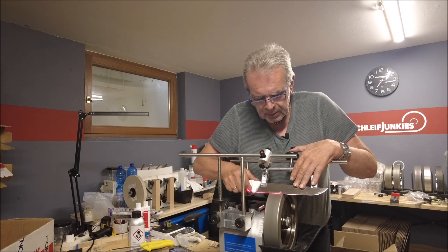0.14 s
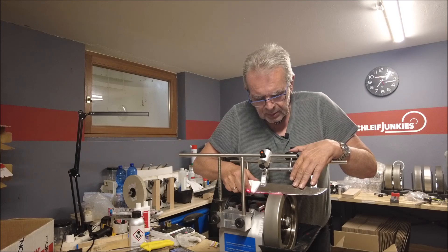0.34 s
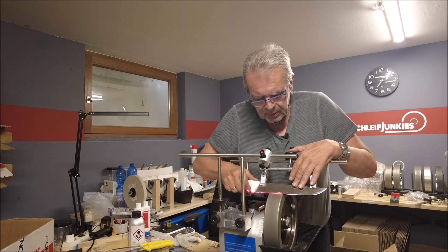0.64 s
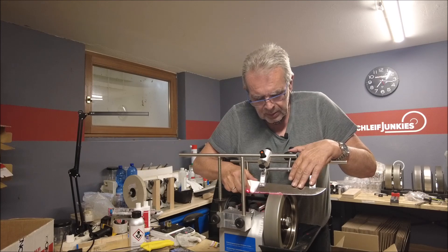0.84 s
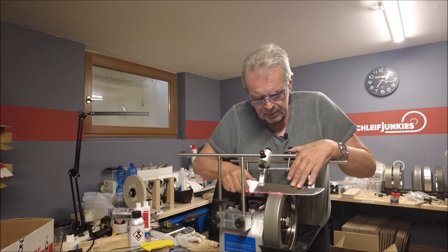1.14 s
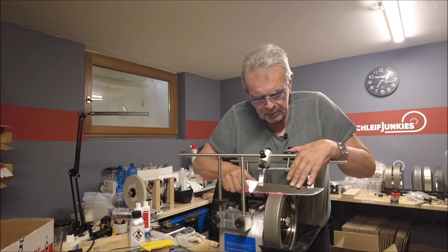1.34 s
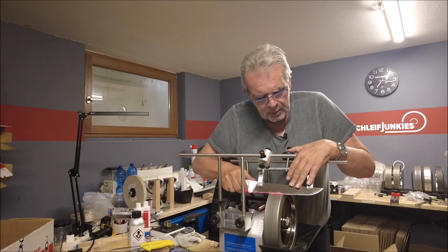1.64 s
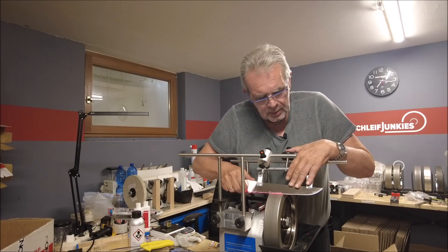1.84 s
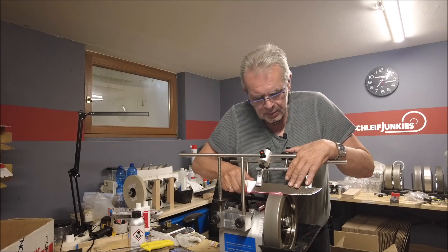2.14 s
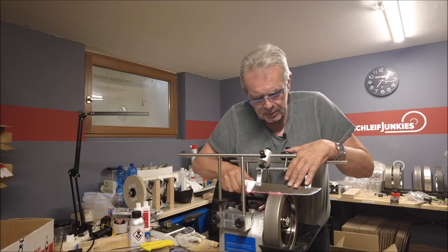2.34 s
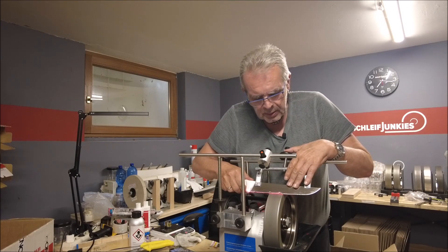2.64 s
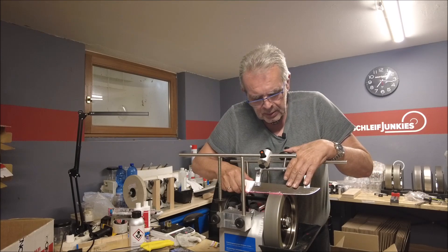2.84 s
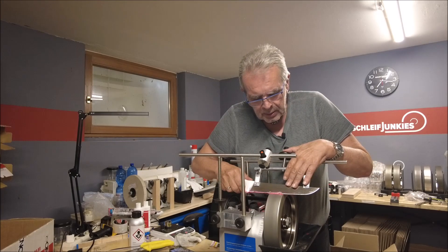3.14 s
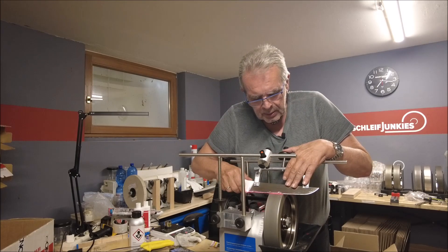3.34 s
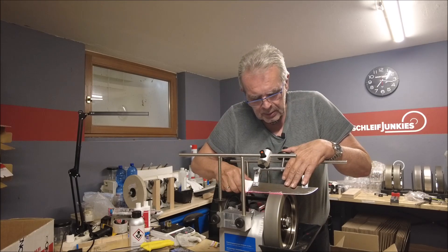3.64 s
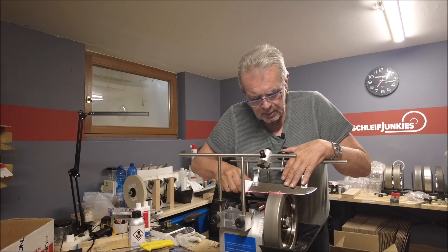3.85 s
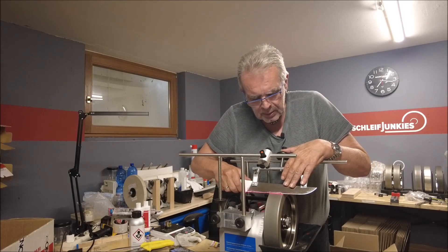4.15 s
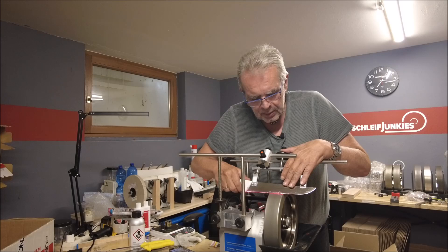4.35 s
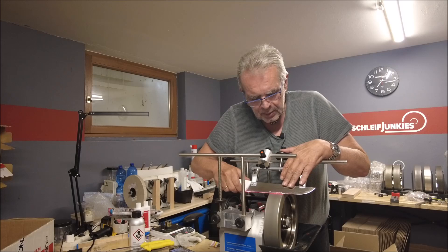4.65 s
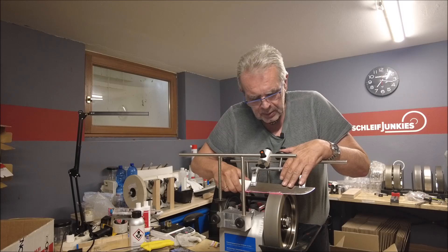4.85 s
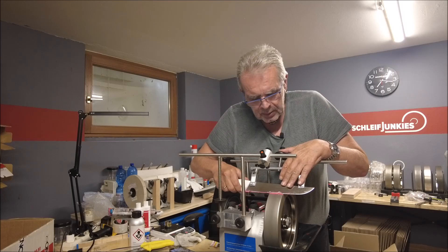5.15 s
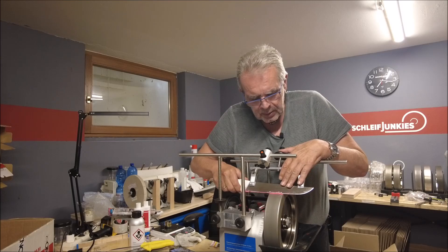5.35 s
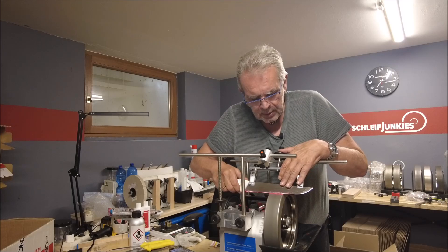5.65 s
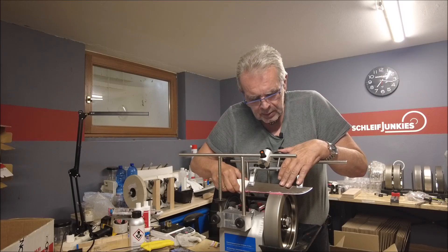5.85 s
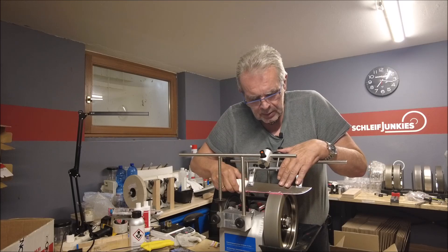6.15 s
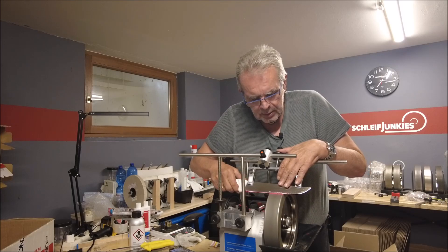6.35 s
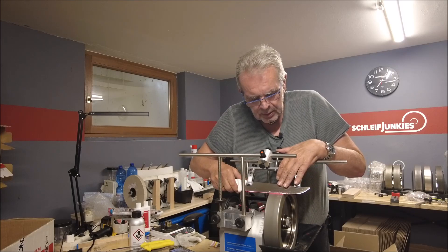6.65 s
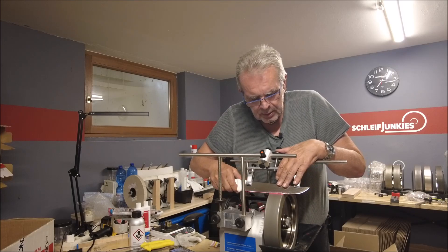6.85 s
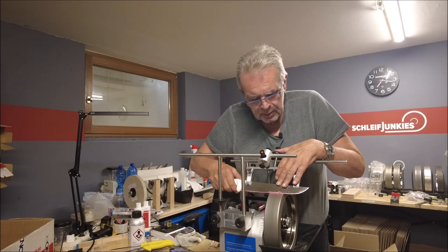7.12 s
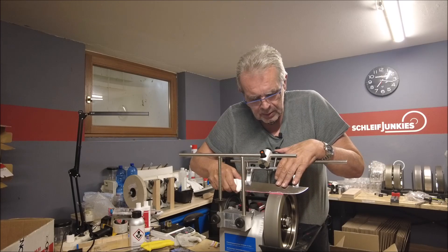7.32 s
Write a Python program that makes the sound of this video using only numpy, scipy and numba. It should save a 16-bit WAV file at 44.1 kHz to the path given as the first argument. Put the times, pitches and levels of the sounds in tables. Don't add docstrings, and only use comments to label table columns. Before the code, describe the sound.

Close in a small workshop, a knife blade is drawn across a spinning grinding wheel without pause. Bright sandy hiss and rough scraping carry wavering glassy squeals, first strong, then thinner in the middle, loudest and most piercing near the end. Loose grit ticks on the steel, and a quiet motor hum grows. A lapel microphone gives a dry, band-limited sound with tiny smeared glitches.

```python
import sys
import numpy as np
from scipy import signal
from scipy.fft import rfft, irfft
from scipy.io import wavfile
from scipy.ndimage import uniform_filter1d
from numba import njit

SR = 44100
rng = np.random.default_rng(int(sys.argv[2]) if len(sys.argv) > 2 else 0)


def materialize(psi):
    bounded = np.clip(np.atleast_2d(psi).T, -1, 1)
    quanta = np.round(bounded * 32767).astype(np.int16)
    wavfile.write(sys.argv[1], SR, quanta)


def level_to_linear(level):
    exponent = np.asarray(level, float) / 20
    return 10 ** exponent


N = 329868
TIME = np.arange(N) / SR

# (time [s], level [dB])
PRESSURE = [(0, -2), (.5, 0), (.75, -2.5), (1.25, 1), (2.0, 1.5), (2.75, -0.5), (3.1, .5), (3.55, -2),
            (4.0, 1.5), (4.25, -3), (4.65, 2.5), (4.9, -0.5), (5.3, 2), (5.75, 0), (6.25, -0.5),
            (6.75, 0.5), (7.2, -3), (7.48, 2)]
# (time [s], rise [dB])
CATCHES = [(.23, 3.5), (.4, 4.5), (.59, 6), (.76, 5.5), (0.949, 9.5), (1.04, 5.5), (1.13, 3), (1.24, 7),
           (1.34, 2.5), (1.75, 2.5), (4.07, 5), (4.33, 7.5), (4.66, 8), (5.29, 5), (5.43, 8.5), (5.55, 0.5),
           (5.67, 7), (5.79, 2.5), (5.89, 5.5), (5.95, 7), (6.01, 5), (6.12, 7), (6.24, 4.5), (6.29, 7),
           (6.39, 4), (6.5, 4.5), (6.8, 7), (6.891, 9.5), (7.19, 10), (7.41, 10)]
# (time [s], level [dB], pitch [Hz])
RING_LOW = [
    (0, -41, 3570),
    (.2, -33.5, 3650),
    (.6, -30.5, 3670),
    (.82, -36.5, 3650),
    (1.0, -27.5, 3776),
    (1.3, -30, 3700),
    (1.55, -31.5, 3745),
    (2.04, -37, 3650),
    (2.3, -48.5, 3520),
]
RING_MID = [
    (3.6, -44, 3500),
    (4.1, -38.5, 3540),
    (4.5, -35.5, 3570),
    (4.7, -32, 3680),
    (4.88, -37, 3620),
    (5.2, -27, 3700),
    (5.5, -43, 3740),
]
RING_HIGH = [
    (0, -43, 4090),
    (.67, -33.5, 4080),
    (1.32, -34, 4140),
    (1.54, -32.5, 4130),
    (1.75, -33.5, 4135),
    (1.92, -32, 4040),
    (2.1, -37.5, 4090),
    (2.61, -35, 4040),
    (2.75, -54, 4040),
]
RING_LATE = [
    (4.95, -31.5, 3900),
    (5.35, -23.5, 3950),
    (6.05, -25, 3993),
    (6.3, -31.5, 3835),
    (6.5, -24, 3994),
    (6.82, -24.5, 4000),
    (6.95, -35.5, 3740),
    (7.1, -40, 3640),
    (7.48, -40, 3625),
]
# (from [s], to [s], middle pitch [Hz], width [Hz], level [dB])
CLAMP_MODES = [(-.5, 2.94, 1395, 38, -52), (3, 5.5, 1080, 38, -50.5), (4.5, 7.9, 1228, 24, -50.5),
               (-11, 9.4, 1735, 78, -52), (0.8, 3, 2420, 54, -49), (5.4, 6.94, 2655, 55, -44.5),
               (1.8, 5.06, 2985, 120, -40.5), (2, 3.68, 3260, 250, -37), (3.5, 5.1, 3150, 270, -39.5),
               (-.5, 2.1, 3240, 180, -46.5), (7, 8.8, 3350, 300, -36.5), (-0.4, 1.2, 3560, 73, -42.5),
               (6.5, 9, 4100, 450, -40.5)]
SPINE_MODES = [(4.8, 7.07, 3725, 123, -31), (2.8, 5.45, 4600, 130, -36.5), (4.8, 7.4, 4485, 160, -39),
               (2.35, 4.8, 4950, 240, -37), (2.0, 5.5, 5325, 150, -43), (5.5, 7.2, 5550, 92, -42),
               (6.93, 7.6, 5300, 130, -36.5), (0.93, 3.4, 5930, 170, -39), (6.4, 7.8, 6125, 100, -46),
               (3.1, 5.0, 6750, 150, -46), (3.7, 4.9, 4050, 560, -44.5), (6.25, 8, 4980, 350, -37)]
FREE_END_MODES = [
    (3.5, 6.3, 1205, 60, -49.5),
    (1.6, 6.15, 2250, 186, -40),
    (-.5, 2.6, 2775, 100, -54.5),
    (1.68, 3.21, 4505, 110, -32.5),
    (4, 5.3, 3850, 340, -34),
]
BEVEL_MODES = [(0.2, 2.9, 7850, 300, -42), (5, 6.22, 8025, 280, -39), (6, 4.77, 9300, 280, -47),
               (0.9, 3.44, 10350, 550, -38), (0, 1.6, 12550, 420, -42), (2.5, 3.0, 11000, 270, -43),
               (3, 4.5, 14250, 800, -46), (5, 8, 14600, 900, -45), (-1, 1.7, 6550, 300, -50)]
BURR_MODES = [(6.32, 7.6, 7980, 380, -43), (0.63, 2.1, 11500, 990, -37.5), (2.55, 5, 11125, 520, -39.5),
              (1.1, 2.2, 13650, 450, -46), (4, 5.9, 12850, 750, -38), (4.76, 6.3, 10175, 510, -40),
              (5.84, 7.58, 10780, 850, -33.5), (3.4, 5.1, 9000, 700, -45), (4.7, 5.9, 13250, 450, -48)]
# (frequency [Hz], level per Hz [dB])
HISS = [(4000, -2), (5500, -2.5), (7100, -6.5), (9000, -4.5), (10900, 0), (13000, -3), (15500, -10),
        (16400, -34)]
RASP = [(1500, -27), (1900, -4), (2300, 9.5), (3400, 7), (4500, 6.5), (6000, -9.5), (7000, 0)]
SCRAPE = [(600, -23), (800, 6.5), (950, -1.5), (1200, 6), (1500, -5), (1800, -1), (2200, -23)]
# (time [s], peak level [dB])
KNOCKS = [(0.1521, -29), (0.388, -19), (0.6494, -12), (0.6737, -15), (1.07, -13), (1.234, -22),
          (1.7524, -15), (1.917, -25), (2.039, -26), (2.438, -22), (2.6683, -25), (2.8679, -34),
          (3.1193, -24), (4.008, -19.5), (4.068, -21), (4.2333, -37), (4.3156, -38), (4.4837, -19),
          (5.522, -17), (5.665, -11.5), (5.8185, -8.5), (5.8835, -29), (6.529, -8), (6.7181, -14),
          (6.734, -6.5), (6.814, -14), (6.894, -17), (7.206, -16), (7.4116, -17.5)]
# (time [s], level [dB])
GRIP = [(0, -41.5), (.6, -37.5), (1.0, -40), (1.8, -39), (2.4, -45), (2.75, -37), (3.1, -43.5),
        (3.9, -38.5), (4.5, -42), (5.4, -38), (6.4, -37), (6.8, -32.5), (7.05, -37.5), (7.25, -36),
        (7.48, -27.5)]
# (time [s], load [0-1])
LOAD = [
    (0, 0.3),
    (.5, 0.06),
    (1.3, 0.13),
    (2.0, 0.49),
    (2.8, 0.69),
    (4.0, 0.88),
    (5.6, 0.96),
    (7.48, 0.96),
]
# (multiple, level against the third [dB])
HUM = [(2, -20.5), (4, -4), (5, -9.5), (6, -8), (7, -12), (9, -20), (10, -16)]
# (frequency [Hz], level per Hz [dB])
CASE = [(12, 16.5), (25, -5), (60, -7.5), (150, -12.5), (280, -5.5), (380, 5.5), (480, 1.5), (900, -3.5)]
# (middle [s], length [s])
LOST = [(.64, .012), (.769, .013), (.831, .014), (1.11, .012), (1.515, .013), (1.802, .034), (1.899, .013),
        (2.101, .035), (2.816, .014), (3.393, .012), (3.52, .014), (3.927, .013), (4.033, .014),
        (4.139, .015), (4.268, .012), (4.352, .013), (4.972, .013), (5.842, .016), (6.742, .012),
        (7.189, .012)]

HISS_DB, RASP_DB, SCRAPE_DB = -32, -39.5, -53
RASP_DB_PER_S, SCRAPE_DB_PER_S = .5, 1.02
RASP_FOLLOW, SCRAPE_FOLLOW, BAR_FOLLOW = 1.1, 0.66, 0.29
WHEEL_HZ, CATCH_S = 4.5, 0.023
CLAMP_CLIMB, SPINE_CLIMB, FREE_CLIMB, BEVEL_CLIMB, BURR_CLIMB = 0.00049, 0.0047, 0.022, 0.0056, 0.032
WHINE_FROM_S, WHINE_HZ, WHINE_CLIMB_HZ, WHINE_BEND = 5.3, 1314, 76.3, 1.5
WHINE_DB, WHINE_RISE_DB, WHINE_RISE_S, WHINE_FLICKER_DB = -37.5, 22, 0.49, 2
WHINE_SPLIT_HZ = 33
KNOCK_WIDTH_HZ, SPINE_DB = 114, -12
GUIDE_BAR_HZ, GUIDE_BAR_WIDTH_HZ = 2049, 10
HUM_HZ = 99.94
THIRD_DB, THIRD_LOAD_DB, EIGHTH_DB, EIGHTH_LOAD_DB, CASE_DB = -52.5, 8.5, -69.5, 27, -46
HUM_DIP_S, HUM_DIP_DB, HUM_DB_PER_S = 3.06, -56, 2
BRIDGE_DB = -2
TOP_HZ = 15750


def blade():
    press_db, = curves(PRESSURE)
    coarse = grit(spread_db=2.5, bite_db=1.46)
    rasp = grit(spread_db=3.0, bite_db=1.23)
    fine = grit(spread_db=1.2, bite_db=.3)
    sheen = grit(spread_db=1.2, bite_db=.7)
    burr = grit(spread_db=1.5, bite_db=1.0)

    scrape_db = SCRAPE_DB + SCRAPE_DB_PER_S * TIME + SCRAPE_FOLLOW * press_db
    rasp_db = RASP_DB + RASP_DB_PER_S * TIME + RASP_FOLLOW * press_db
    out = level_to_linear(HISS_DB + press_db) * patchy(colour(fine, HISS), patchy_db=2.0)
    out += level_to_linear(scrape_db) * colour(fine, SCRAPE)
    out += level_to_linear(rasp_db) * colour(rasp, RASP)

    out += ring(coarse, RING_LOW, 152.0) + ring(coarse, RING_HIGH, 170.0)
    out += ring(rasp, RING_LATE, 200.0) + ring(rasp, RING_MID, 150.0)
    out += swells(coarse, CLAMP_MODES, CLAMP_CLIMB)
    out += swells(coarse, SPINE_MODES, SPINE_CLIMB)
    out += swells(coarse, FREE_END_MODES, FREE_CLIMB)
    out += swells(sheen, BEVEL_MODES, BEVEL_CLIMB)
    out += swells(burr, BURR_MODES, BURR_CLIMB)
    return out + whine(sheen) + knocks() + guide_bar(fine, press_db)


def grit(spread_db, bite_db):
    grains = rng.standard_normal(N) * level_to_linear(spread_db * rng.exponential(size=N))
    wheel = np.sin(2 * np.pi * WHEEL_HZ * TIME + 1.05)
    flicker = walk(110) + .7 * walk(35) + .3 * walk(11)
    return unit(grains * level_to_linear(bite_db * (flicker + .5 * wheel)))


def patchy(hiss, patchy_db):
    out = hiss.copy()
    for hz in np.geomspace(5000., 15000., 8):
        band = mode(hiss, np.full(N, hz), hz / 7)
        out += (level_to_linear(patchy_db * walk(4)) - 1) * band
    return out


def ring(drive, table, width):
    db, hz = curves(table)
    for s, rise_db in CATCHES:
        db = db + rise_db * np.exp(-((TIME - s) / CATCH_S) ** 2)
    fade_s = .1
    inside = np.minimum(TIME - table[0][0] + fade_s, table[-1][0] + fade_s - TIME)
    edge = np.clip(inside / fade_s, 0, 1)
    hz = uniform_filter1d(hz, size=4500) * (1 + 0.0072 * walk(9))
    return level_to_linear(db) * edge * steady(steep(drive, hz, width), size=2600)


def swells(drive, table, climb):
    out = np.zeros(N)
    for t0, t1, hz, width, db in table:
        part = slice(max(int(t0 * SR), 0), min(int(t1 * SR), N))
        way = (TIME[part] - t0) / (t1 - t0)
        glide = hz * (1 + climb * (TIME[part] - (t0 + t1) / 2))
        tone = unit(steep(drive[part], glide, 1.15 * width))
        out[part] += level_to_linear(db + 1.2 * walk(7)[part]) * abs(np.sin(np.pi * way)) ** .5 * tone
    return out


def whine(drive):
    since = np.maximum(TIME - WHINE_FROM_S, 0)
    db = WHINE_DB - WHINE_RISE_DB * np.exp(-since / WHINE_RISE_S) + WHINE_FLICKER_DB * walk(12)
    hz = WHINE_HZ + WHINE_CLIMB_HZ * since ** WHINE_BEND
    strand = steep(drive, hz, 29.0)
    twin = steep(drive, hz - WHINE_SPLIT_HZ * since, 32.0)
    return level_to_linear(db) * np.clip(since / 0.17, 0, 1) * steady(strand + 0.66 * twin, size=7000)


def knocks():
    s, db = np.transpose(KNOCKS)
    hits = np.zeros(N)
    hits[(s * SR).astype(int)] = level_to_linear(db)
    after = TIME[:1500]
    spine = np.zeros(len(after))
    for hz, db in [(3320, -1.0), (3650, -3.5), (4120, -15), (2920, -29.0)]:
        spine += level_to_linear(db) * np.exp(-after / 0.0035) * np.sin(2 * np.pi * hz * after)
    hz = np.where(TIME < 3, curves(RING_LOW)[1], curves(RING_LATE)[1])
    blade_mode = mode(hits, hz, 1. * KNOCK_WIDTH_HZ) * SR / (2 * np.pi * KNOCK_WIDTH_HZ)
    return level_to_linear(SPINE_DB) * signal.fftconvolve(hits, spine)[:N] + blade_mode


def guide_bar(drive, press_db):
    bar = mode(drive, np.full(N, 1. * GUIDE_BAR_HZ), 1. * GUIDE_BAR_WIDTH_HZ)
    return level_to_linear(curves(GRIP)[0] + BAR_FOLLOW * press_db) * steady(bar, size=14000)


def motor():
    load, = curves(LOAD)
    hum_db = HUM_DIP_DB + HUM_DB_PER_S * abs(TIME - HUM_DIP_S)
    third_db = THIRD_DB + THIRD_LOAD_DB * load
    eighth_db = EIGHTH_DB + EIGHTH_LOAD_DB * load
    levels = [(1, hum_db), (3, third_db), (8, eighth_db)]
    levels += [(k, third_db + db) for k, db in HUM]
    out = level_to_linear(CASE_DB) * colour(rng.standard_normal(N), CASE) * level_to_linear(0.88 * walk(2.5))
    for k, db in levels:
        phase = 2 * np.pi * (round(k) * HUM_HZ * TIME + rng.random())
        out += np.sqrt(2) * level_to_linear(db + 1.5 * walk(4) + .8 * walk(11)) * np.sin(phase)
    return out


@njit
def mode(x, hz, width):
    y, band, low = np.empty(len(x)), 0., 0.
    for i in range(len(x)):
        g, damping = np.tan(np.pi * hz[i] / SR), width / hz[i]
        v = (band + g * (x[i] - low)) / (1 + g * (g + damping))
        band, low, y[i] = 2 * v - band, low + 2 * g * v, damping * v
    return y


def steep(drive, hz, width):
    narrow = mode(drive, hz, 1. * width)
    return mode(mode(narrow, hz, 2. * width), hz, 2. * width)


def steady(tone, size):
    return unit(tone / np.sqrt(uniform_filter1d(tone ** 2, size) + 1e-12))


def colour(x, points):
    hz, db = np.transpose(points)
    f = np.maximum(np.fft.rfftfreq(N, 1 / SR), 1)
    gain_db = np.interp(np.log(f), np.log(hz), db, left=-60, right=-60)
    return unit(irfft(rfft(x) * level_to_linear(gain_db), N))


def walk(rate):
    k = int(SR / rate)
    steps = rng.standard_normal(1000)[np.arange(N) // k % 1000]
    return unit(uniform_filter1d(uniform_filter1d(steps, k), k))


def curves(table):
    s, *columns = np.transpose(table)
    return [np.interp(TIME, s, c) for c in columns]


def unit(x):
    return x / np.sqrt(np.mean(x ** 2))


def scene():
    return np.tile(blade() + motor(), (2, 1))


def bridge(x, count, size, fade):
    out, window = x.copy(), np.hanning(size)
    edges = (3 * size * (np.arange(count + 1) / count) ** 1.8).astype(int)
    for middle, length in np.add(LOST, (0, .0115)):
        start, span = int((middle - length / 2) * SR), int(length * SR)
        before = x[start - size:start]
        held = rfft(before * window, 8 * size)
        tops = np.array([lo + np.argmax(abs(held[lo:hi])) for lo, hi in zip(edges, edges[1:])])
        steps = np.arange(size, size + span)
        turns = 2 * np.pi * np.outer(steps, tops) / (8 * size)
        tones = (np.exp(1j * turns) @ held[tops]).real
        tones = unit(tones) * np.std(before) * level_to_linear(BRIDGE_DB)
        ramp = np.clip(np.minimum(steps - size, size + span - steps) / fade, 0, 1)
        out[start:start + span] += ramp ** 0.66 * (tones - x[start:start + span])
    return out


def low_pass(x):
    return signal.sosfilt(signal.butter(12, 15750, fs=SR, output="sos"), x)


def record(dry):
    top = signal.ellip(10, .2, 80, TOP_HZ, fs=SR, output="sos")
    sent = signal.sosfilt(top, bridge(dry[0], count=15, size=640, fade=600))
    return low_pass(np.tile(sent, (2, 1)))


dry = scene()
out = record(dry)
materialize(out)
```